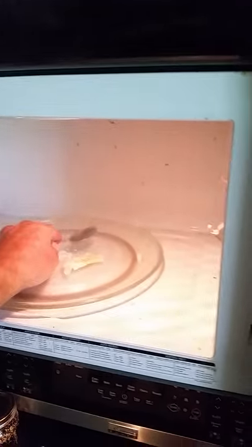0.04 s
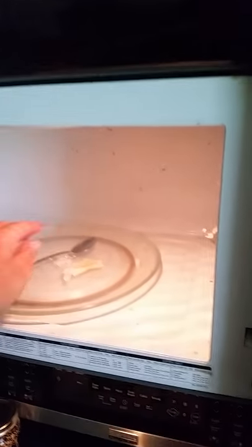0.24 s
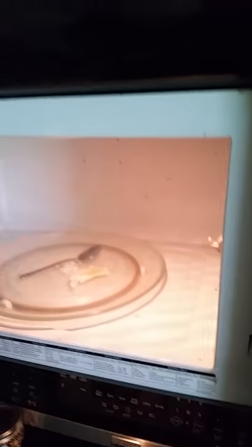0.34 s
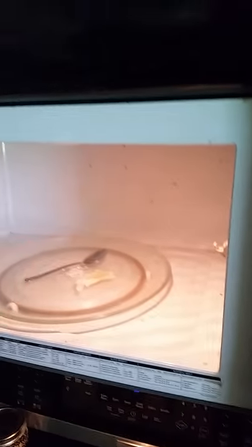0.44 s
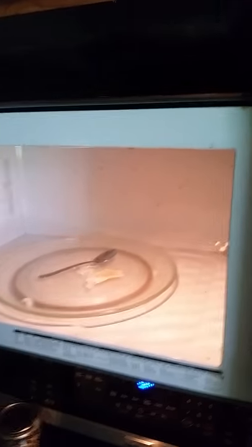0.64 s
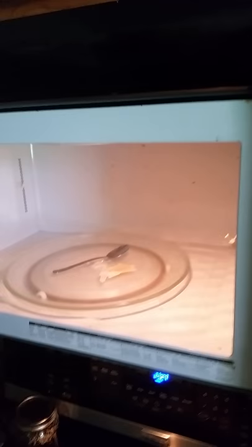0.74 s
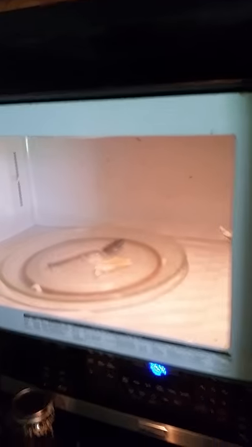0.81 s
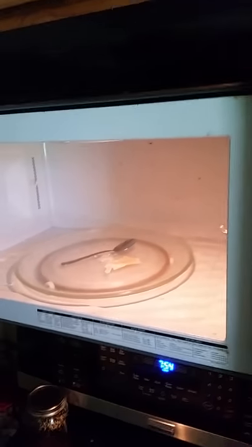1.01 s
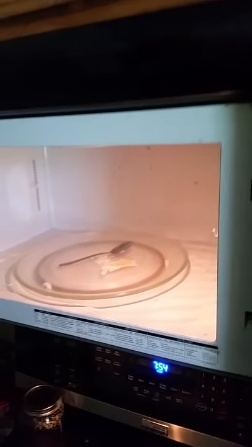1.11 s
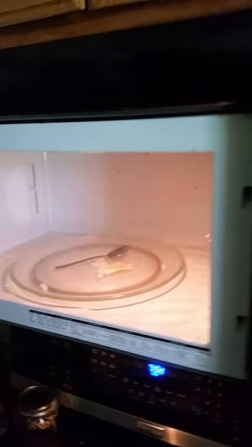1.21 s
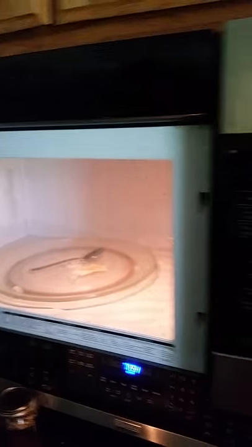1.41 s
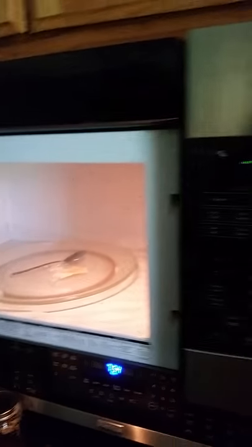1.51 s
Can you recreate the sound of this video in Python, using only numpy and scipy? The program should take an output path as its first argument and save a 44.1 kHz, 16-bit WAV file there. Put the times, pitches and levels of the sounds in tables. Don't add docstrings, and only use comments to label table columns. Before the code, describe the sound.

Bright ringing clatter of a steel spoon dropped on a glass turntable, over low kitchen hum

```python
import sys
import numpy as np
from scipy import signal
from scipy.fft import rfft, irfft, next_fast_len
from scipy.io import wavfile

SR = 44100
rng = np.random.default_rng(int(sys.argv[2]) if len(sys.argv) > 2 else 0)


def materialize(psi):
    bounded = np.clip(np.atleast_2d(psi).T, -1, 1)
    quanta = np.round(bounded * 32767).astype(np.int16)
    wavfile.write(sys.argv[1], SR, quanta)


def level_to_linear(level):
    exponent = np.asarray(level, float) / 20
    return 10 ** exponent


N = 68355
SIDES = np.array([[1], [-1]])

# start in seconds, then level in dB of modes above 12300 Hz, from 6000, from
BOUNCES = [(0.2068, -14, -16, -27.5, -33.5), (0.2122, -13.5, -20, -32, -36),
           (0.235, -8.5, -34.5, -37.5, -40.5), (0.2614, -20, -25, -37, -46),
           (0.2736, -19.5, -21.5, -31, -45.5), (0.28, -19, -21, -32.5, -34.5),
           (0.2874, -18, -20.5, -31.5, -32), (0.2964, -22, -26.5, -29, -33),
           (0.3085, -17.5, -26.5, -32, -34.5), (0.314, -14.5, -29.5, -32, -34),
           (0.3249, -11, -33, -34, -38.5), (0.3364, -15.5, -25, -31.5, -38.5),
           (0.3506, -10.5, -29, -37.5, -45), (0.3614, -15, -25.5, -39, -43.5),
           (0.3763, -12.5, -22.5, -37, -39.5), (0.3958, -10, -24.5, -33.5, -39),
           (0.4142, -19.5, -25.5, -36, -41), (0.4207, -13, -24, -36.5, -35.5),
           (0.4268, -17.5, -19.5, -34.5, -36), (0.4457, -13.5, -19.5, -39.5, -46),
           (0.4594, -22, -31.5, -40, -43.5), (0.4831, -22.5, -31, -42.5, -51),
           (0.5018, -26, -33, -47.5, -45)]
# time in seconds, level in dB.
CHATTER = [
    (.2, -120),
    (.208, -44),
    (.26, -43.5),
    (.285, -29),
    (.42, -34),
    (.49, -36.5),
    (.525, -57),
    (.56, -77.5),
    (.6, -120),
]
ROLLER_HZ = [334, 235, 845, 1082, 1320, 1600, 1750, 2620, 2980, 3250]
# width in Hz, level in dB.
ROLLER = [(60, -22), (70, -22), (26, -17.5), (38.5, -23.5), (39, -24.5), (57.93, -23.5), (50, -30.5),
          (40, -20.5), (29.3, -17.5), (35.07, -11.5)]
PLATE_HZ = [1158, 1270, 2070, 2210, 2300, 3100, 3455, 3680, 4280, 4910, 5080, 5300, 5600, 5767]
# width in Hz, level in dB.
PLATE = [(14, 3), (39, -11), (19.7, -3), (24, -2), (40.15, -16), (35, -6.5), (30.7, -3), (14, -7.5),
         (44, -11.5), (24, -3.5), (29.4, -7.5), (29.8, -18.5), (28, -11.5), (22, -4.5)]
BOWL_HZ = [6560, 6813, 7460, 8080, 8345, 8740, 9137, 9880, 10208, 10700, 11111, 11500, 11845, 12021]
# width in Hz, level in dB.
BOWL = [(24.9, -9), (17, -3), (33.82, -23), (22, -16.5), (29.5, -12.5), (21, -0.5), (23.8, -14),
        (29.6, -17), (25, -3), (35, -10.5), (32, -6.5), (36.9, -8), (19, 5), (24, 3.5)]
RIM_HZ = [12530, 12800, 13100, 13397, 13520, 13804, 14000, 14300, 14530, 14604, 15000, 15250, 15484, 15528]
# width in Hz, level in dB.
RIM = [(30, -12), (27, -15.5), (50, -10.5), (24, -7.5), (35.3, -12.5), (19, -4.5), (40.35, -14), (55, -14),
       (35.19, -10), (34, -0.5), (55, -16.5), (55, -16.5), (40, -5.5), (28, -1)]
# frequency in Hz, left minus right in dB.
CLINK_SIDE = [(500, 1), (1150, -0.5), (3400, 1), (5000, -5), (7000, 0), (8400, 18.5), (9300, 13.5),
              (11700, -7.5)]


def spoon():
    chatter_per_s, chatter_spread_db = 400, -0.5
    bounce_db, strike_spread_db = -18, 4
    sharpness, contact_width_hz = 1.5, 190
    twin_split_hz, twin_db = 85, -8.5
    port_lead_rad, scatter_rad, scatter_full_hz = 0.9, 1.5, 9000
    bodies = [(ROLLER_HZ, ROLLER, -44), (PLATE_HZ, PLATE, -44), (BOWL_HZ, BOWL, -38.5), (RIM_HZ, RIM, -34.5)]

    s, rim, bowl, plate, low = np.transpose(BOUNCES)
    at, size = (s * SR).astype(int), SR * 4 // 5
    chatter_db = in_time(CHATTER)[:size] + chatter_spread_db * rng.standard_normal(size).clip(-1, 1)
    touch = (rng.random(size) < chatter_per_s / SR) * level_to_linear(chatter_db)
    out = np.zeros((2, N))
    for pitches, modes, body_db in bodies:
        for hz, (width, level_db) in zip(pitches, modes):
            db = (low, plate, bowl, rim)[np.searchsorted([1900, 6000, 12300], hz)]
            clicks = touch * rng.standard_normal(size)
            strike_db = db - db.max() + bounce_db
            strike_db = strike_db + strike_spread_db * rng.standard_normal(len(s)).clip(-1, 1)
            clicks[at] += level_to_linear(strike_db) * rng.choice([-1, 1], len(s))

            scatter = scatter_rad * np.sqrt(min(hz / scatter_full_hz, 1))
            leads = port_lead_rad + scatter * rng.standard_normal(len(s) + 1)
            lead = leads[np.searchsorted(at, np.arange(size), "right")]
            both = choked(clicks * np.exp(0.5j * SIDES * lead), hz, width / sharpness, at).real

            split = twin_split_hz * (1 + rng.random(2)) / 2 * rng.choice([-1, 1], 2) * hz / 5000
            twins = np.array([ring(clicks, hz + d, width, np.pi / 2) for d in split])
            both = both + level_to_linear(twin_db) * twins

            reach = contact_width_hz * np.sqrt(hz / 3000)
            soft = rms_one(ring(ring(both, hz, reach), hz, reach))
            mode_db = level_db + body_db + SIDES * at_hz(CLINK_SIDE, hz) / 2
            out[:, :size] += level_to_linear(mode_db) * np.sqrt(width / 30) * soft
    return out


def choked(press, hz, width, at):
    choke_db = -7
    pole = np.exp((2j * np.pi * hz - np.pi * width) / SR)
    state, parts = np.zeros((2, 1), complex), []
    for part in np.split(press + 1e-18, at, axis=1):
        out, state = signal.lfilter([1], [1, -pole], part, zi=level_to_linear(choke_db) * state)
        parts.append(out)
    return np.concatenate(parts, axis=1)


# frequency in Hz, level in dB per Hz.
CRACK = [(400, -10), (1200, -9), (3450, -8.5), (5000, -13), (6100, -46.5), (7300, -30), (8500, -10.5),
         (15800, -7.5)]


def cracks():
    crack_db, t60_s, later_dull_db, glitter_hz = -17, 0.1, -19, 7600
    first, *later = [level_to_linear(rim + 10.5 + crack_db) * dying(s, t60_s, 0.0045) for s, rim, *rest in BOUNCES]
    later = level_to_linear(-10.5) * sum(later)

    def shape(hz):
        lean = level_to_linear(SIDES * at_hz(CLINK_SIDE, hz) / 2)
        return lean * (first + later * level_to_linear(later_dull_db * (hz < glitter_hz)))
    return coloured(CRACK, 0.77, shape)


# time in seconds, level in dB.
SWING = [
    (0.19, -68.5),
    (0.21, -53.5),
    (0.23, -37.5),
    (0.266, -58.5),
    (0.284, -47.5),
    (0.418, -41.5),
    (0.5, -74),
]


def plate_hum():
    swing_hz, side_db, lead_rad = 530.7, 10, 1.1
    after_hz, after_s, after_db, after_t60_s = 848, 0.49, -70, 2.24
    t = np.arange(N) / SR
    swing_db = np.interp(t, *np.transpose(SWING), left=-120, right=-120) + 2 + SIDES * side_db / 2
    swing = level_to_linear(swing_db) * np.sin(2 * np.pi * swing_hz * t + SIDES * lead_rad / 2)
    wavering = level_to_linear(after_db + 1.8 * drift(12)) * dying(after_s, after_t60_s, 0.0086)
    return swing + wavering * np.sin(2 * np.pi * after_hz * t)


def cavity(x):
    size = next_fast_len(N + SR)
    w = 2 * np.pi * np.arange(size // 2 + 1) / size
    t60 = np.interp(w, [0, np.pi * 0.7], [0.34, 0.22])
    walls = []
    for side in range(2):
        response = 0
        for k, delay in enumerate(rng.integers(90, 500, 8)):
            echo = np.exp(-1j * w * delay)
            response = response + (-1) ** k * echo / (1 - level_to_linear(-60 * delay / SR / t60) * echo)
        walls.append(response)
    return irfft(rfft(x, size) * np.array(walls), size)[:, :N] / 8


def kitchen(x):
    t60_s, treble_t60_s = 0.44, 0.32
    white, size = rng.standard_normal((2, N)), next_fast_len(N + SR // 2)
    dull = signal.sosfilt(signal.butter(2, 6000, fs=SR, output="sos"), white)
    tail = dull * dying(0.01, t60_s, 0.02) + (white - dull) * dying(0.01, treble_t60_s, 0.02)
    return irfft(rfft(x, size) * rfft(rms_one(tail) / np.sqrt(N), size), size)[:, :N]


# frequency in Hz, level in dB per Hz.
THUD = [(24, -31), (40, 2.5), (319, -1), (611, -17.5), (1100, -24), (2390, -35), (2820, -50), (6000, -54),
        (7800, -84), (13200, -120)]


def thud():
    level_db, start_s = -34.5, 1.022
    again_db, again_s = -20.5, 0.055

    def shape(hz):
        t60 = np.interp(np.log(hz), np.log([300, 4000]), [0.42, 0.12])
        rise = 0.012 * (300 / hz) ** 2
        again = level_to_linear(again_db + 9.8 * (500 < hz < 1000))
        return dying(start_s, t60, rise) + again * dying(start_s + again_s, t60, rise)
    return level_to_linear(level_db) * coloured(THUD, 0, shape)


# frequency in Hz, level in dB per Hz.
SWISH = [(3000, -23), (4000, -18), (6500, -27), (8600, -2), (10000, -16), (12200, -2.5), (15800, -6)]


def swish():
    peak_s, rise_s, fall_s, flick_s = 0.972, 0.03, 0.045, 1.027
    level_db, flick_db = -73, 6.5
    t = np.arange(N) / SR - peak_s
    swell = np.exp(-(t / np.where(t < 0, rise_s, fall_s)) ** 2)
    flick = level_to_linear(flick_db) * dying(flick_s - 0.008, 0.18, 0.0049)
    return level_to_linear(level_db) * (swell + flick) * coloured(SWISH, 0)


# time in seconds, level in dB.
SWELL = [
    (1.05, -73.5),
    (1.15, -57.5),
    (1.31, -54),
    (1.4, -52.5),
    (1.55, -45.5),
]
# frequency in Hz, level in dB per Hz.
MOTOR = [(25, -10), (98, 1.5), (150, -12), (373, -9.5), (700, -27), (1300, -32.5), (2200, -34.5),
         (3000, -35)]


def motor():
    edge_hz, whine_hz, whine_db = 2400, 12700, -38.5
    edge = signal.butter(8, edge_hz, fs=SR, output="sos")
    body = signal.sosfilt(edge, coloured(MOTOR, patchy_db=3.0))
    whine = rms_one(ring(rng.standard_normal((2, N)), whine_hz, 400))
    return level_to_linear(in_time(SWELL)) * (body + level_to_linear(whine_db) * whine)


# time in seconds, level in dB.
GAIN = [(0, -29.5), (.1, -31.5), (.17, -31), (.19, -31.5), (.201, -40), (.22, -52.5), (.3, -49.5),
        (.43, -46.5), (.55, -51.5), (.65, -50), (.9, -51.5), (.97, -52.5), (1.15, -57), (1.55, -50)]
# frequency in Hz, level in dB per Hz.
FLOOR = [(15, -50), (25, -26.5), (114, 1.5), (152, -16.5), (250, -13), (325, -13), (470, -18.5),
         (4500, -43), (5850, -79.5), (9900, -120)]
# frequency in Hz, width in Hz, level in dB over the floor.
HUM = [(95.6, 42, -9), (123.2, 3.7, -2), (193.7, 11, -9), (245.5, 18, -6.5), (473.4, 8.7, -16.5)]
# frequency in Hz, level in dB per Hz.
HISS = [(2650, -30.5), (4500, -1.5), (6370, -22), (8500, -0.5), (10600, -12.5), (13100, -4), (15800, -9)]


def room_floor():
    hiss_db, hiss_follows, floor_dulls = -32.5, 1.3, 0.2
    hum = sum(level_to_linear(db) * rms_one(ring(rng.standard_normal(N), hz, width)) for hz, width, db in HUM)
    gain_db = in_time(GAIN)
    duck_db = gain_db - gain_db[0]
    duller = level_to_linear(floor_dulls * duck_db)
    hiss = level_to_linear(hiss_db + hiss_follows * duck_db) * coloured(HISS, patchy_db=0.7)
    rumble = coloured(FLOOR, 0.5, lambda hz: duller if hz > 900 else 1)
    return level_to_linear(gain_db - 6) * (rumble + hum) + level_to_linear(gain_db[0]) * hiss


# frequency in Hz, likeness from 0 to 1.
LIKENESS = [(60, .95), (180, 0.8), (550, 0), (1650, 0.2), (5000, 0.2), (15000, 0)]


def coloured(spectrum, patchy_db, shape=lambda hz: 1):
    out, power, edges = 0, 0, 22 * 2 ** np.arange(0, 9.7, 1 / 3)
    white = rng.standard_normal((2, 2, N))
    for k, (low, high) in enumerate(zip(edges, edges[1:])):
        hz, flicker = np.sqrt(low * high), drift(12)
        if spectrum[0][0] < hz < spectrum[-1][0]:
            band = signal.butter(2, [low, high], "band", fs=SR, output="sos")
            mid, side = signal.sosfilt(band, white[k % 2])
            alike, gain = at_hz(LIKENESS, hz), level_to_linear(at_hz(spectrum, hz))
            power += gain ** 2 * (high - low) * 4 / SR
            stereo = np.sqrt(1 + alike) * mid + np.sqrt(1 - alike) * side * SIDES
            out = out + gain * level_to_linear(patchy_db * flicker) * shape(hz) * stereo
    return out / np.sqrt(power)


def ring(clicks, hz, width, phase=0.):
    r, w = np.exp(-np.pi * width / SR), 2 * np.pi * hz / SR
    strike = [np.sin(phase), r * np.sin(w - phase)]
    return signal.lfilter(strike, [1, -2 * r * np.cos(w), r * r], clicks + 1e-18)


def dying(start_s, t60, rise_s):
    t = np.maximum(np.arange(N) / SR - start_s, 0)
    return (1 - np.exp(-t / rise_s)) * np.exp(-np.log(1000) * t / t60)


def drift(rate_hz):
    r = np.exp(-80 * np.pi * rate_hz / SR)
    slow = signal.lfilter([1], [1, -2 * r, r * r], rng.standard_normal(N // 40 + 2002))[2000:]
    return np.interp(np.arange(N) / 40, np.arange(len(slow)), rms_one(slow))


def rms_one(x):
    return x / np.sqrt(np.mean(x ** 2) + 1e-20)


def in_time(rows):
    s, db = np.transpose(rows)
    return np.interp(np.arange(N) / SR, s, db)


def at_hz(points, hz):
    table_hz, value = np.transpose(points)
    return np.interp(np.log(hz), np.log(table_hz), value)


# frequency in Hz, width in Hz, depth from 0 to 1.
DIPS = [(6000, 800, 0.81), (7280, 450, .93), (3880, 200, .55), (2807, 260, .7), (1480, 150, 0.3)]


def ports(x):
    self_noise_db = -90.5
    for hz, width, depth in DIPS:
        x = x - depth * signal.lfilter(*signal.iirpeak(hz, hz / width, fs=SR), x)
    return x + level_to_linear(self_noise_db) * rng.standard_normal(x.shape)


def scene():
    cavity_db, kitchen_db = -12, -17
    clink = spoon() + cracks()
    answer = level_to_linear(cavity_db) * cavity(clink) + level_to_linear(kitchen_db) * kitchen(clink)
    return clink + plate_hum() + answer + room_floor() + motor() + thud() + swish()


def low_pass(x):
    return signal.sosfilt(signal.butter(12, 16850, fs=SR, output="sos"), x)


def record(dry):
    cutoff_hz, fade_s = 15850, 0.004
    top_cut = signal.ellip(12, 0.5, 70, cutoff_hz, fs=SR, output="sos")
    cut = signal.sosfilt(top_cut, ports(dry))
    fade = np.minimum((N - np.arange(N)) / SR / fade_s, 1)
    return low_pass(cut * fade)


dry = scene()
out = record(dry)
materialize(out)
```